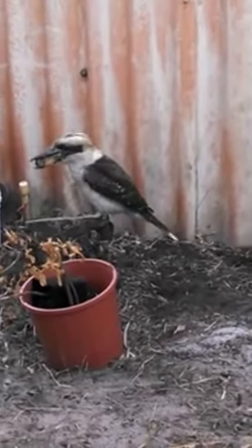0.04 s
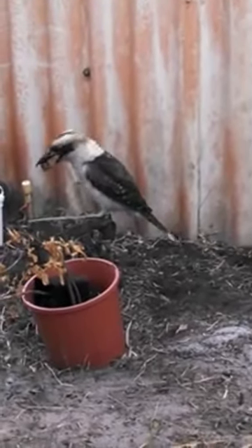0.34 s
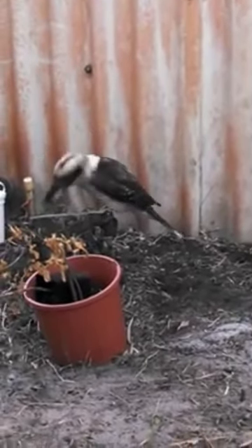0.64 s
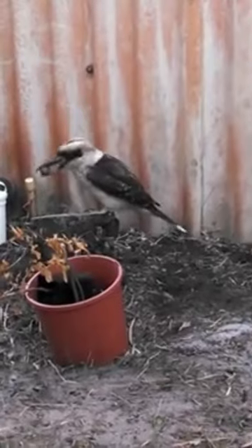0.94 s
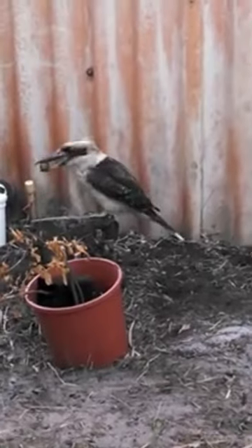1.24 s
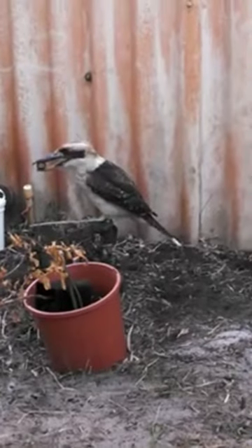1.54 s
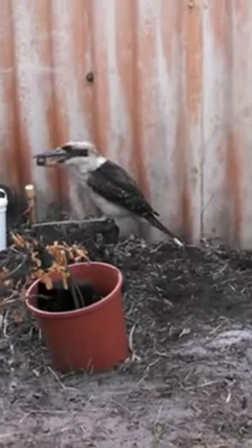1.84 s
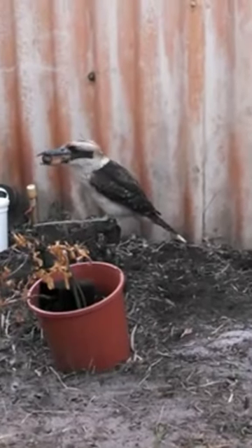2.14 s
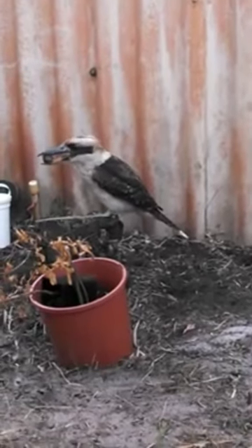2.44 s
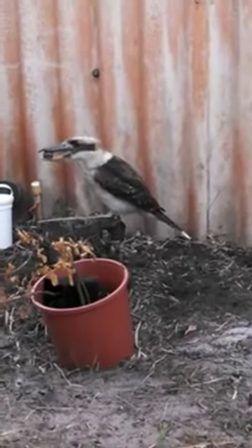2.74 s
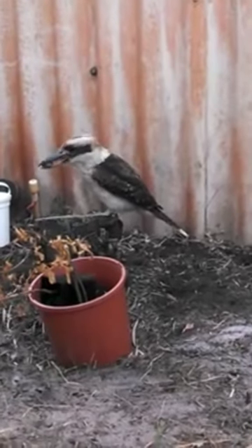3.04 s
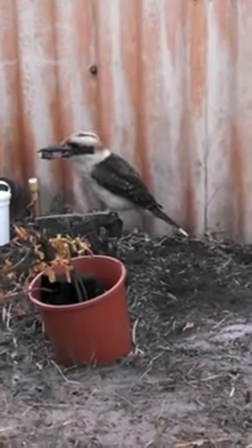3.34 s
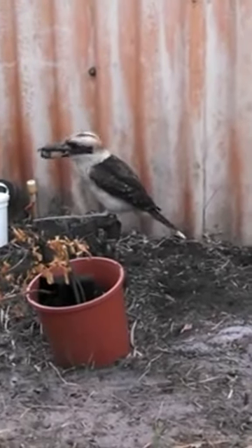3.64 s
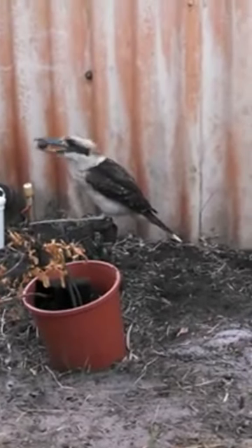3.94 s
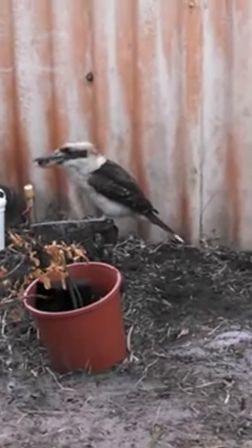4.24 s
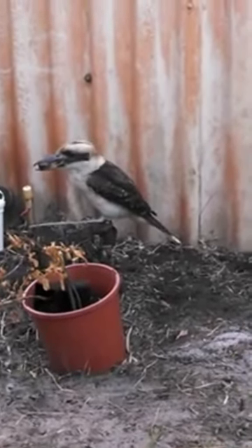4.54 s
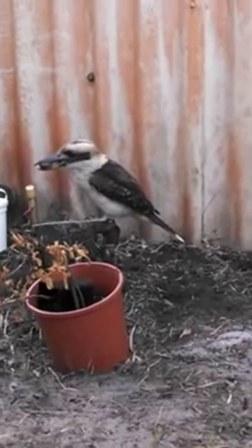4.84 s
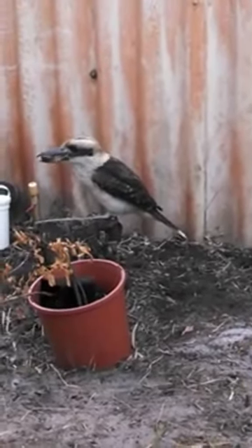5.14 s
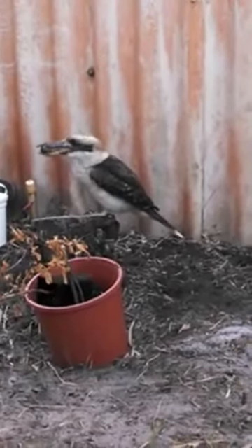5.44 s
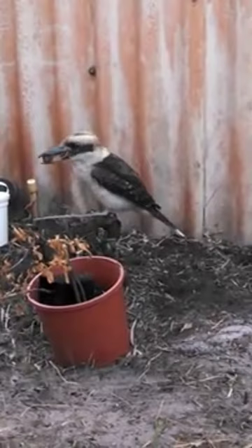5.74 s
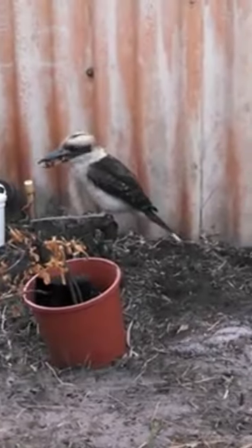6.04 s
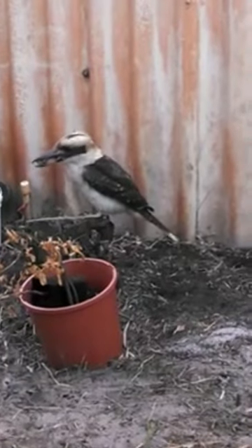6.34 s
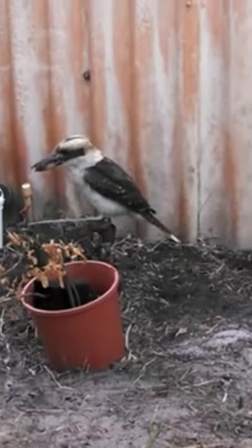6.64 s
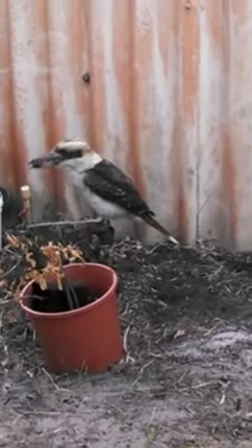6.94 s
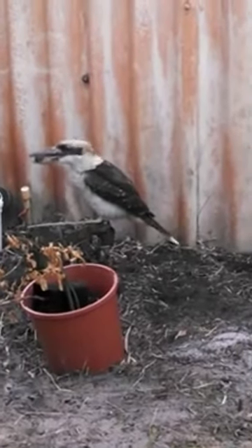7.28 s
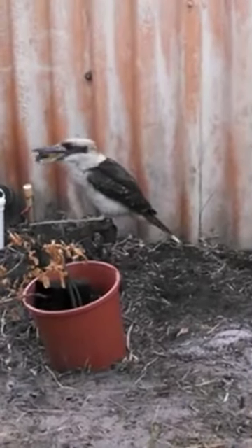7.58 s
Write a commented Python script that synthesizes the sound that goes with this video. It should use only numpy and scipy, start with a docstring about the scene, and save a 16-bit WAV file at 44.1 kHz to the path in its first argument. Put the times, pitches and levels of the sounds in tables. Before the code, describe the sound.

Brittle clicks and crunches of a snail shell in a bird's bill, with one hard knock, over low garden rumble and distant birds.

```python
"""Kookaburra cracking a snail

A kookaburra crunches a snail in its bill and strikes it once on a planter, in front of an iron fence.
Brittle fracture makes each crack, and the same force excites the damped modes of the hollow bill.
Far birds whistle and screech over outdoor air and engine hum; a few soft taps land close by.
The two microphones are cross-fed for width, and a limiter ducks on the hardest cracks."""
import sys
import numpy as np
from scipy import signal
from scipy.fft import rfft, irfft
from scipy.io import wavfile
from scipy.ndimage import uniform_filter1d, minimum_filter1d

SR = 44100
rng = np.random.default_rng(int(sys.argv[2]) if len(sys.argv) > 2 else 0)


def put_to_file(sound):
    """Save the sound as 16-bit audio at rate SR, in the file named by the first command-line argument."""
    columns = np.atleast_2d(sound).T  # one column per channel
    safe = np.clip(columns, -1, 1)
    whole_steps = np.round(safe * 32767)
    wavfile.write(sys.argv[1], SR, whole_steps.astype(np.int16))


N = 335601
TIME = np.arange(N) / SR
MIC_LAG_SAMPLES = 11
FRACTURE_RISE_S = 0.00046


def undb(db):
    """Decibels to amplitude ratio."""
    return 10 ** (np.asarray(db) / 20)


def unit(x):
    """Normalise to an energy of one."""
    return x / np.sqrt(np.sum(x ** 2, axis=-1, keepdims=True))


def burst(x, db):
    """Normalise to the energy of 1 ms at an rms level of db."""
    return unit(x) * undb(db) * np.sqrt(SR / 1000)


def band(x, low_hz, high_hz, order=2):
    """Causal band-pass filter."""
    return signal.sosfilt(signal.butter(order, [low_hz, high_hz], "band", fs=SR, output="sos"), x)


def delay(x, samples):
    """Pure delay by whole samples."""
    return np.concatenate([np.zeros(x.shape[:-1] + (samples,)), x[..., :-samples]], axis=-1)


def add(out, start_s, x):
    """Superpose x on out from start_s."""
    i = int(start_s * SR)
    out[..., i:i + x.shape[-1]] += x[..., :N - i]


def wander(rate_hz):
    """Interpolated random modulation with a spread near one."""
    knots = rng.standard_normal(int(N / SR * rate_hz) + 2)
    return np.interp(TIME * rate_hz, np.arange(len(knots)), knots)


def decay(t, t60_s):
    """Exponential damping: 60 dB down at t60_s."""
    return np.exp(-np.log(1000) * t / t60_s)


def damped_sine(t, hz, t60_s):
    """Free vibration of a single mode."""
    return np.sin(2 * np.pi * hz * t) * decay(t, t60_s)


def ring(modes, t, detune=0, spread_db=0):
    """Modal superposition, with optional random spread of pitch and strength."""
    out = np.zeros(len(t))
    for hz, db, t60_s in modes:
        gain = undb(db + spread_db * rng.standard_normal())
        out += gain * damped_sine(t, hz * (1 + detune * rng.standard_normal()), t60_s)
    return out


def early_reflections(x, echo_db=0):
    """Multipath: direct sound, later and weaker on the right, plus ground scatter and a fence echo."""
    t = TIME[:2048]
    ground = undb(-10.5) * unit(rng.standard_normal((2, len(t))) * decay(t, 0.015))
    fence = undb(-6) * unit(rng.standard_normal((2, len(t))) * decay(t, 0.029))  # corrugations smear it
    paths = undb(echo_db) * (ground + delay(fence, int(0.0032 * SR)))
    paths[0, 0] += 1
    paths[1, MIC_LAG_SAMPLES] += undb(-4)
    return signal.fftconvolve(x[None], paths, axes=1)


def reverberation(x, t60_s, high_hz):
    """Diffuse field: dense reflections decay exponentially, uncorrelated at the two microphones."""
    t = TIME[:SR // 2]
    noise = band(rng.standard_normal((2, len(t))), 380, high_hz, order=1)
    tail = noise * decay(t, t60_s) * np.minimum(t / 0.0026, 1)
    return signal.fftconvolve(x[None], unit(tail), axes=1)[:, :N]


# Spectrum of the outdoor air: frequency_hz, common_db_per_hz, difference_db_per_hz
AIR_SPECTRUM = [(25, -76, -100), (44.5, -68, -78), (70.4, -66, -71.5), (109, -65, -75), (173, -72.5, -79),
                (280, -78, -82), (522, -81.5, -87), (1450, -94.5, -91), (2080, -92.5, -93),
                (4980, -100.5, -100.5), (8560, -105, -106), (10070, -117.5, -117.5),
                (14700, -117.5, -117.5), (17500, -126, -126)]
# Its slow swell: time_s, gain_db
AIR_SWELL = [(0, -0.5), (1.9, -0.5), (2.45, -1), (3.1, -1), (3.8, -1.5), (4.3, 0), (5.3, 0.5), (7.6, 1.5)]


def air(waver_db=1.23, low_cut_hz=22):
    """Partly coherent noise: the microphones share the low rumble but hear independent hiss."""
    hz, *spectra_db = np.transpose(AIR_SPECTRUM)
    f = np.maximum(np.arange(N // 2 + 1) * SR / N, 1)
    shapes = [undb(np.interp(np.log(f), np.log(hz), db)) * np.sqrt(SR / 2) for db in spectra_db]
    mid, side = (rfft(rng.standard_normal(N)) * shape for shape in shapes)
    noise = irfft(np.array([mid + side, mid - side]) / (1 + (low_cut_hz / f) ** 4), N)
    swell_db = np.interp(TIME, *np.transpose(AIR_SWELL))
    return noise * undb(swell_db + waver_db * wander(rate_hz=9))


# Bands of the engine hum: centre_hz, width_hz, base_level_db
ENGINE_BANDS = [(71.3, 13, -49), (124.5, 17.3, -50)]
# Their swell: time_s, lower_gain_db, upper_gain_db
ENGINE_SWELL = [(0, 6, -13), (.3, 0, 5), (.7, 1, -6), (1.35, -1, 6.5), (1.8, 8, 0.5), (2.65, -8, 6.5),
                (3.1, 1, -6.5), (3.65, 2, 7), (4.1, 10, 0.5), (4.65, 5.5, 6.5), (4.9, -3, 5.5),
                (5.3, -16, 2), (5.75, 1.5, 5), (6.15, 3.5, 1), (6.8, -9, -1.5), (7.35, 6.5, -9)]


def far_engines():
    """Narrow-band noise: distant engines hum in two bands that swell and sink."""
    times_s, *swells_db = np.transpose(ENGINE_SWELL)
    out = np.zeros(N)
    for (hz, width_hz, db), swell_db in zip(ENGINE_BANDS, swells_db):
        hum = band(rng.standard_normal(N), hz - width_hz / 2, hz + width_hz / 2)
        out += unit(hum) * np.sqrt(N) * undb(db + np.interp(TIME, times_s, swell_db))
    return out


def fracture(t):
    """Brittle fracture: a millisecond of tiny breaks gives a broadband pulse of force."""
    envelope = t / FRACTURE_RISE_S * np.exp(-0.5 * (t / FRACTURE_RISE_S) ** 2)
    force = rng.standard_normal(len(t)) * envelope
    for _ in range(6):  # flatten the spectrum while keeping the pulse short
        white = irfft(np.exp(1j * np.angle(rfft(force))))
        force = white * np.sqrt(envelope)
    return unit(force)


def crumble(t, length_s, gap_s=0.0013):
    """Crack propagation: one fracture sets off weaker ones at uneven intervals, and fine splinters."""
    force = fracture(t)
    chances = rng.standard_normal((40, 2))  # at most 40 further fractures
    for after_s, (jitter, strength) in zip(np.arange(gap_s, length_s, gap_s), chances):
        lag = max(int((after_s + 0.25 * gap_s * jitter) * SR), 1)
        force += undb(-9 + 4 * strength) * decay(after_s, 0.26) * delay(fracture(t), lag)
    splinters = rng.standard_normal(len(t)) * decay(t, 0.015)
    return unit(force) + undb(-17.5) * unit(splinters)


# Where the shell radiates, from large pieces to the finest chips: pitch_hz
SHELL_HZ = [2690, 3960, 6140, 8550, 12600]


def shell_radiation(force, gains_db, piece_hz, peak_db=3, width_hz=420):
    """Source and filter: the shell radiates lows poorly, and the breaking piece adds a resonance."""
    size = len(force)
    hz = [1480, *SHELL_HZ, SR / 2]
    db = [gains_db[0] - 15, *gains_db, gains_db[-1]]
    f = np.maximum(np.arange(size // 2 + 1) * SR / size, 1)
    resonance_db = peak_db * np.exp(-0.5 * ((f - piece_hz) / width_hz) ** 2)
    response_db = np.interp(np.log(f), np.log(hz), db) + resonance_db
    # Folding the cepstrum gives minimum phase, so the attack stays sharp.
    cepstrum = irfft(np.log(undb(response_db)))
    cepstrum[1:size // 2] *= 2
    cepstrum[size // 2 + 1:] = 0
    return signal.fftconvolve(force, irfft(np.exp(rfft(cepstrum))))[:size]


# Modes of the hollow bill: pitch_hz, relative_db, t60_s
BILL_MODES = [(1090, -7, 0.018), (1190, 3.5, 0.011), (1610, 2, 0.0083), (2040, 5, 0.0087),
              (2470, 3, 0.0098)]


def crack(bill_db, piece_hz, shell_gains_db, crumble_s=0):
    """Forced vibration: one breaking force drives shell and bill, whose modes shift with the grip."""
    t = TIME[:4096]
    force = crumble(t, crumble_s)
    bill_response = ring(BILL_MODES, t, detune=0.044, spread_db=2)
    bill = band(signal.fftconvolve(force, bill_response)[:len(t)], 1170, 3400)
    shell = shell_radiation(burst(force, -1.5), shell_gains_db, piece_hz)
    return shell + burst(bill, bill_db)


# Bites on the shell: start_s, bill_db, piece_hz, gain_db at each of the five SHELL_HZ, crumble_s
BITES = [(0.0161, -38, 5040, -50, -34, -23.5, -31, -42, 0.00043),
         (0.5725, -49, 4350, -49.5, -54, -36, -41, -58, 0),
         (0.6187, -45, 3470, -17, -36, -31, -33, -46, 0.009),
         (0.663, -47, 5100, -45, -46, -23, -34, -48, 0),
         (0.7375, -30.5, 4600, -28, -22.5, -18, -25, -34, 0.0052),
         (1.216, -32, 3280, -13, -24, -31, -35, -49, 0.0033),
         (1.32, -34, 5100, -27, -58, -22, -26, -41, 0.0021),
         (1.547, -26, 3300, -15, -25.5, -24, -33, -44, 0.0055),
         (1.5529, -38, 4200, -12, -33, -32, -21, -38, 0),
         (1.680, -39, 5230, -28, -35, -18, -8, -31, 0.0079),
         (1.685, -31.5, 4300, -27, -30, -13, -19, -36, 0.0054),
         (1.6894, -34, 5000, -33, -31, -17, -23, -36, 0),
         (1.9819, -31.5, 4560, -10, -26.5, -23.5, -35, -53, 0),
         (2.205, -34.5, 4030, -36, -38, -34, -40, -46, 0.0093),
         (2.3392, -32.5, 5100, -48, -25, -22, -26, -31, 0.0046),
         (2.856, -30.5, 3320, -14, -44, -42, -44, -54, 0),
         (2.9458, -45, 5280, -30, -39, -35, -34, -50, 0.0048),
         (3.0218, -25, 4400, -15, -21.5, -13.5, -22, -33, 0.0052),
         (3.048, -30.5, 5200, -46, -21, -14, -21.5, -34, 0),
         (3.1286, -58, 4590, -41, -36, -33, -42, -55, 0.0066),
         (3.1466, -15, 4970, -28, -6, 1, -5.5, -24, 0), (3.1549, -30, 4390, -11, -19, -13, -14, -23, 0),
         (3.1847, -46, 3380, -15, -20.5, -31, -26, -40, 0.005),
         (3.41, -43, 3320, -18, -30.5, -28, -31, -43, 0.023),
         (3.6531, -48, 4900, -19, -37, -37, -35, -57, 0.0036),
         (3.947, -44, 3810, -24, -41, -36, -35.5, -51, 0.0061),
         (4.2201, -42, 5230, -18.5, -33, -23.5, -24, -42, 0.061),
         (4.528, -58, 3400, -16, -24.5, -33, -27, -45, 0.001),
         (4.6616, -40, 4000, -36, -33, -29, -39, -50, 0.044),
         (4.6958, -34, 3960, -11, -14.5, -19, -19.5, -34, 0.015),
         (4.7244, -19.5, 4000, -20, -5, -6.5, -14, -23, 0.00042),
         (4.729, -44, 4100, -29, -32, -15, -33, -27, 0.019),
         (5.4956, -41, 3700, -16.5, -27.5, -24, -29, -42, 0.019),
         (5.7585, -53, 3830, -31, -43, -29, -45, -49, 0.004),
         (5.871, -40.5, 4410, -50, -28, -25, -28, -40.5, 0),
         (5.9105, -38, 4500, -38, -22.5, -21.5, -25, -37, 0.011),
         (5.9155, -41, 4400, -33, -32, -29, -27, -40, 0.019),
         (5.935, -37.5, 3900, -35, -35, -24, -29, -35, 0.0051),
         (6.1552, -39, 4480, -14, -20, -23, -39, -46, 0.0031),
         (6.4246, -36, 4310, -37, -44, -34, -44, -45, 0.033),
         (6.531, -46, 4390, -36, -40, -37, -31, -46, 0.012),
         (6.5562, -30, 4480, -33, -27, -24, -33, -42, 0.016),
         (6.5639, -30.5, 4440, -19, -26, -23, -21, -31, 0),
         (6.5684, -28, 4370, -26, -19, -17, -26, -32, 0.0061),
         (7.1667, -48, 5300, -37, -40, -31, -31, -46, 0.013),
         (7.31, -50, 4520, -38, -36, -28, -28.5, -39, 0.008),
         (7.5385, -44, 4330, -31, -35, -24, -30, -46, 0.027)]


def bites():
    """Stress release: each bite breaks off a piece of shell with its own spectrum."""
    out = np.zeros((2, N))
    for start_s, bill_db, piece_hz, *gains_db, crumble_s in BITES:
        add(out, start_s, early_reflections(crack(bill_db, piece_hz, gains_db, crumble_s)))
    return out


# Soft taps near the microphones: start_s, level_db, pitch_hz
TAPS = [(.315, -37.5, 810), (2.243, -22.5, 750), (2.2655, -33, 710), (2.287, -45, 420), (5.523, -31.5, 750),
        (5.639, -34, 590)]


def taps():
    """Heavily damped impacts: a few cycles over a low thump, reaching the right microphone first."""
    out, t = np.zeros(N), TIME[:SR // 20]
    thump = undb(-9) * unit(damped_sine(t, hz=330, t60_s=0.013))
    for start_s, db, hz in TAPS:
        tap = damped_sine(t, hz, t60_s=0.011) * np.minimum(t / 0.001, 1)
        add(out, start_s, burst(unit(tap) + thump, db))
    return np.array([undb(-3) * delay(out, MIC_LAG_SAMPLES), out])


def slips(probability=0.3, max_lead_s=0.054, bill_db=-57):
    """Stick and slip: the shell shifts in the bill with a faint tick before some of the bites."""
    out = np.zeros((2, N))
    for start_s, _, piece_hz, *_ in BITES:
        luck, lead, strength = rng.random(3)
        if luck < probability and start_s > max_lead_s:
            tick = crack(bill_db, piece_hz, shell_gains_db=[-50, -46.5, -49, -50, -61])
            add(out, start_s - lead * max_lead_s, early_reflections(tick * undb(2 + 8 * strength)))
    return out


# Modes of the planter edge: pitch_hz, relative_db, t60_s
PLANTER_MODES = [(170, -6, 0.14), (249, -28, 0.051), (376, -10.5, 0.089), (510, -5, 0.054), (686, 3, 0.016),
                 (850, -5, 0.025), (1160, 6.5, 0.016), (1480, 4, 0.014), (2830, 10.5, 0.0047),
                 (4040, 6, 0.0076)]


def planter_blow(echo_db, start_s=0.6868):
    """Impulse excitation: the shell cracks, and both it and the planter ring at their own modes."""
    out, t = np.zeros((2, N)), TIME[:SR // 6]
    snap = crack(bill_db=-8.5, piece_hz=3880, shell_gains_db=[-1.5, -9.5, -2.5, 3.5, -9.5])
    shell = damped_sine(t, hz=6845, t60_s=0.0064) * np.minimum(t / FRACTURE_RISE_S, 1)
    knock = ring(PLANTER_MODES, t)
    add(out, start_s, early_reflections(snap, echo_db))
    add(out, start_s, early_reflections(burst(knock, -4) + burst(shell, -4.5), echo_db))
    return out


def bird_calls(notes, harmonics_db, taper, direct_db, echo_db):
    """Frequency and amplitude modulation: fast flutter roughens gliding notes; the gardens echo them."""
    out = np.zeros(N)
    pitch_flutter, level_flutter = 0.063 * wander(rate_hz=700), 0.71 * wander(rate_hz=260)
    for start_s, length_s, first_hz, last_hz, bend_hz, db, roughness, tilt_db in notes:
        now = (TIME >= start_s) & (TIME < start_s + length_s)
        progress = (TIME[now] - start_s) / length_s
        arch = np.maximum(4 * progress * (1 - progress), 0)
        hz = first_hz + (last_hz - first_hz) * progress + bend_hz * arch
        phase = 2 * np.pi * np.cumsum(hz * (1 + roughness * pitch_flutter[now])) / SR
        voice = sum(undb(harmonic_db + tilt_db * (k - 1.5)) * np.sin((k + 1) * phase)
                    for k, harmonic_db in enumerate(harmonics_db))
        out[now] += undb(db) * arch ** taper * (1 + roughness * level_flutter[now]) * voice
    direct = np.array([out, delay(out, samples=9)])
    return undb(direct_db) * direct + undb(echo_db) * reverberation(out, t60_s=0.53, high_hz=8600)


# Whistled notes from the next gardens:
# start_s, length_s, first_hz, last_hz, bend_hz, relative_db, roughness, tilt_db_per_harmonic
WHISTLES = [(1.858, 0.041, 2070, 2670, 20, -61, 0.4, -8.5),
            (1.905, 0.034, 2490, 2360, -170, -50.5, 0.33, 3), (1.95, 0.099, 2400, 2380, -110, -49, .22, 1),
            (2.06, 0.023, 2074, 1955, 129, -44, 0.3, 7), (2.065, 0.045, 2650, 2880, 28, -57.5, 0.5, -6),
            (6.8, .08, 2910, 3210, 81.5, -59, 0.57, -1)]


def whistles():
    """Harmonic tones with abrupt onsets, carried mainly by the first two partials."""
    return bird_calls(WHISTLES, harmonics_db=[0.5, 4.5, -17], taper=0.21, direct_db=-2, echo_db=-5.5)


# Harsher notes from further off:
# start_s, length_s, first_hz, last_hz, bend_hz, relative_db, roughness, tilt_db_per_harmonic
SCREECHES = [(2.59, .13, 1735, 1640, 28, -57, 0.41, 5), (2.57, 0.084, 2100, 2590, 0, -64, 0.43, -4),
             (2.69, .13, 2158, 2226, 129.5, -49, 0.6, 0), (2.74, 0.064, 1790, 1873, 31, -54.5, 0.92, -5),
             (2.755, 0.079, 2310, 2200, 1, -58, 0.21, 1), (4.735, .128, 2270, 2157, 110, -47, 0.49, -5),
             (4.835, 0.065, 1706, 1870, 1, -52.5, 0.9, -2), (5.3, 0.097, 1760, 1984, 32, -49.5, 1, 8),
             (5.315, 0.077, 1985, 2113, 88, -48, 0.72, 1)]


def screeches():
    """Rough tones with a weak fundamental; distance lowers the direct-to-reverberant ratio."""
    return bird_calls(SCREECHES, harmonics_db=[-17, 2, -3.5, -23], taper=0.85,
                      direct_db=-6.5, echo_db=-7.5)


def scene(blow_echo_db=-6):
    """Superposition of all sources; the blow sounds drier than the bites, with weaker echoes."""
    crunching = bites() + slips()
    blow = planter_blow(blow_echo_db)
    into_yard = crunching[0] + undb(blow_echo_db) * blow[0]
    yard = undb(-16.5) * reverberation(into_yard, t60_s=0.27, high_hz=14000)
    return air() + far_engines() + crunching + taps() + blow + yard + whistles() + screeches()


def limiter(x, ceiling_db=-14, recovery_db_per_s=9, hold_s=0.17):
    """Look-ahead limiting: the gain drops just before a peak, holds, then climbs at a steady rate."""
    power = uniform_filter1d(np.mean(x ** 2, axis=0), size=44)  # 1 ms average
    over_db = np.maximum(10 * np.log10(np.maximum(power, 1e-12)) - ceiling_db, 0)
    half_hold = int(hold_s * SR / 2)
    held_db = minimum_filter1d(-over_db, size=2 * half_hold + 1, origin=half_hold)
    climb_db = recovery_db_per_s * TIME
    gain_db = climb_db - np.maximum.accumulate(climb_db - held_db)
    ahead_db = minimum_filter1d(gain_db, size=89)
    return x * undb(uniform_filter1d(ahead_db, size=45))


def record(dry, cross_gain=0.87, cross_lag_samples=16, right_db=1.0, top_hz=16000):
    """Delayed antiphase cross-feed widens the image; limiting and a steep low-pass follow."""
    wide = dry - cross_gain * delay(dry[::-1], cross_lag_samples)
    limited = limiter(wide * undb([[0], [right_db]]))
    return signal.sosfilt(signal.ellip(8, 0.2, 70, top_hz, fs=SR, output="sos"), limited)


dry = scene()
out = record(dry)
put_to_file(out)
```